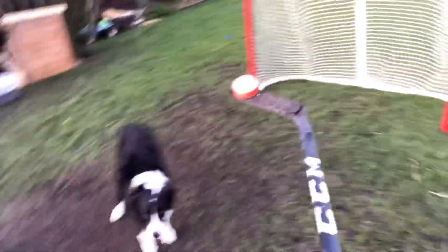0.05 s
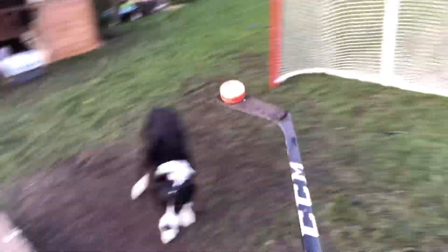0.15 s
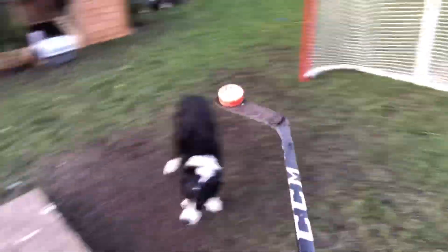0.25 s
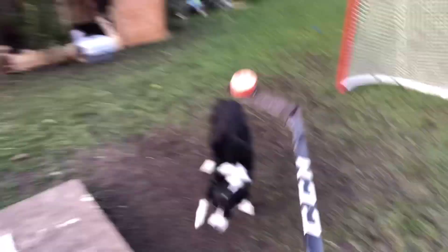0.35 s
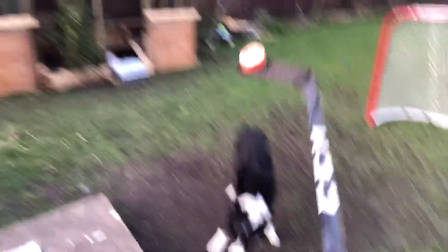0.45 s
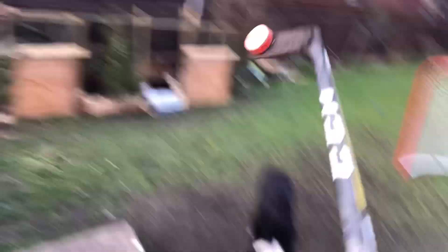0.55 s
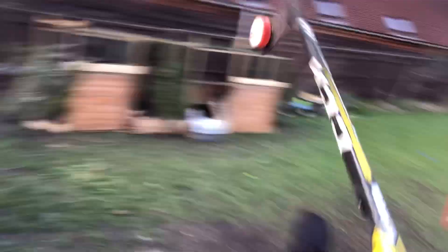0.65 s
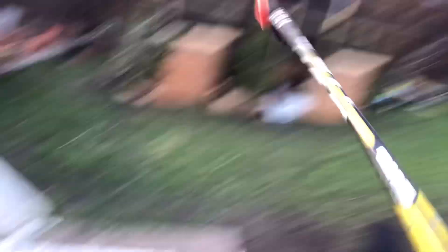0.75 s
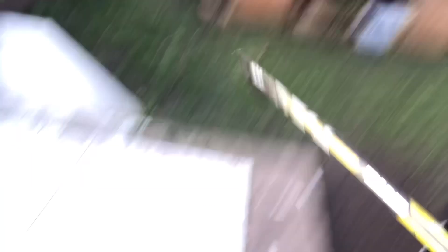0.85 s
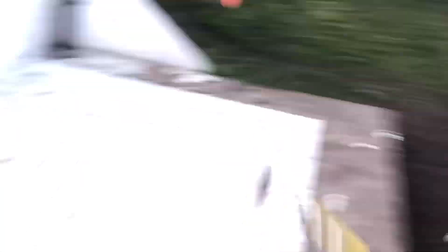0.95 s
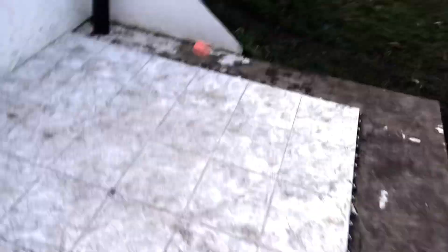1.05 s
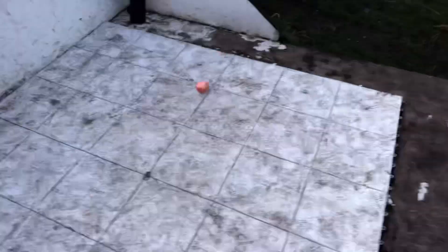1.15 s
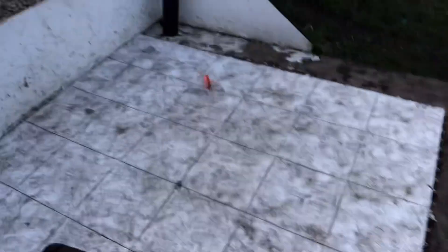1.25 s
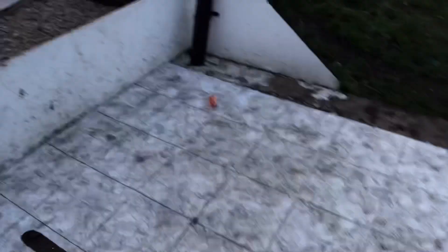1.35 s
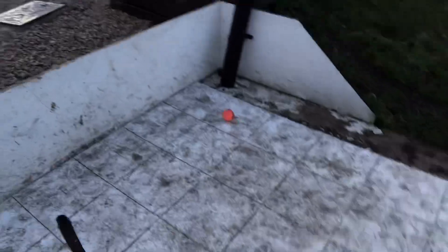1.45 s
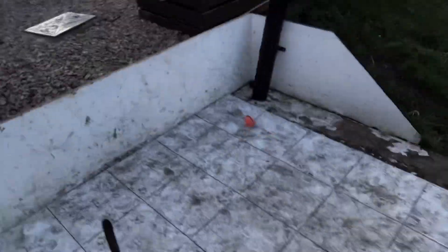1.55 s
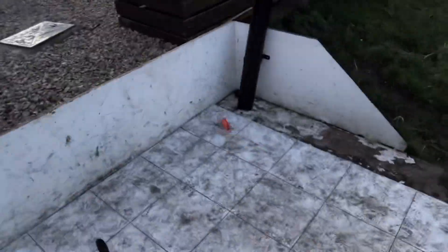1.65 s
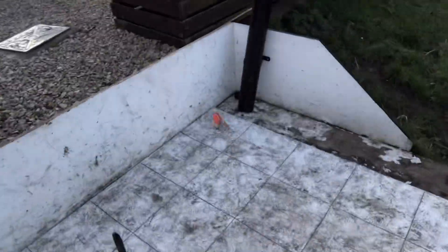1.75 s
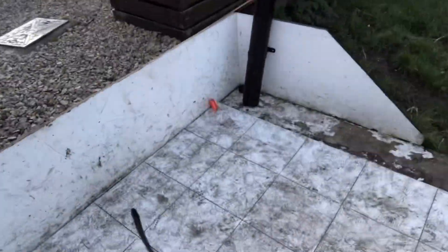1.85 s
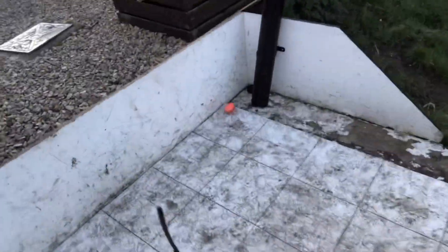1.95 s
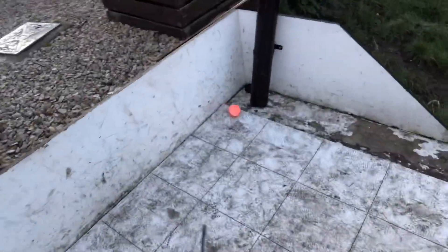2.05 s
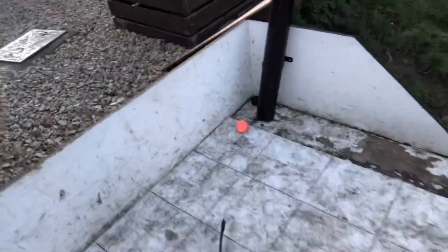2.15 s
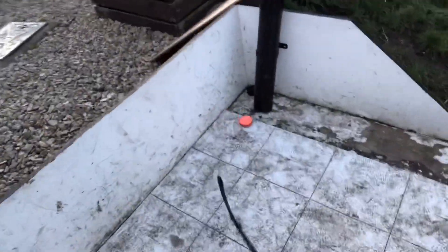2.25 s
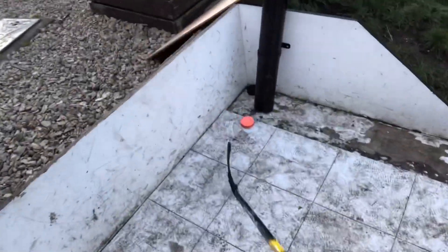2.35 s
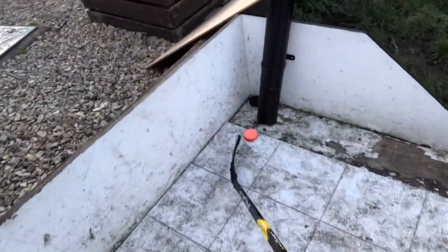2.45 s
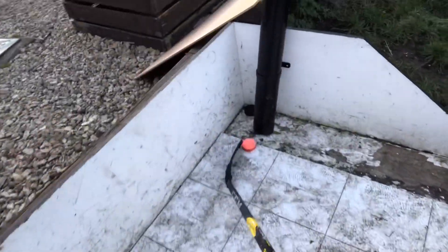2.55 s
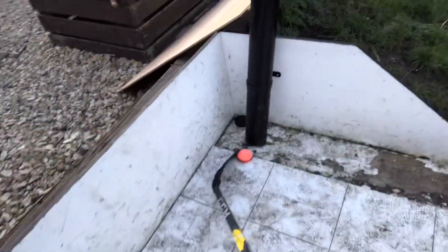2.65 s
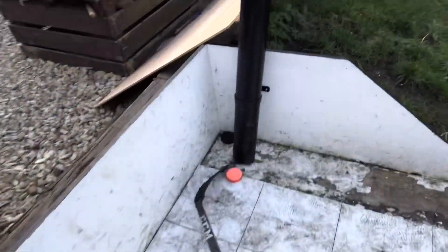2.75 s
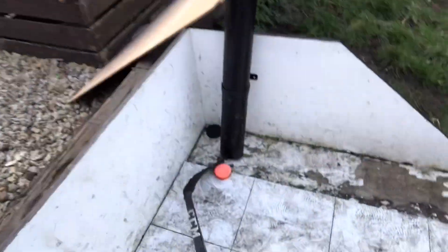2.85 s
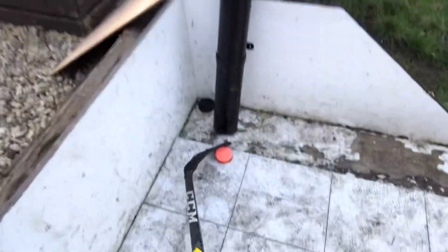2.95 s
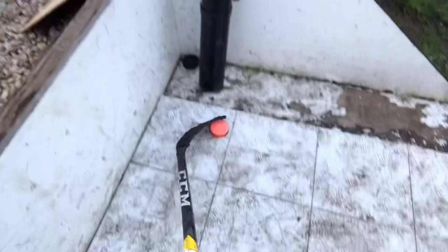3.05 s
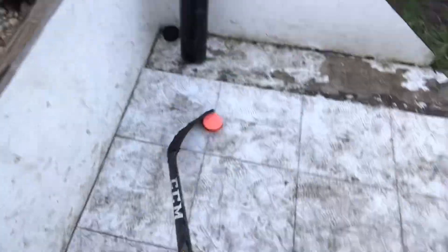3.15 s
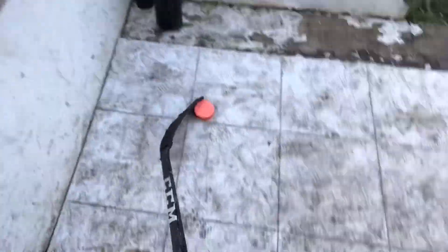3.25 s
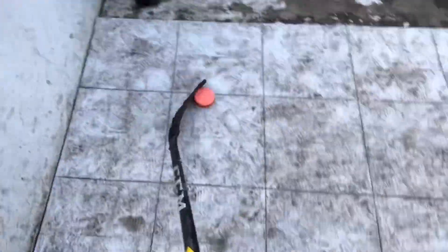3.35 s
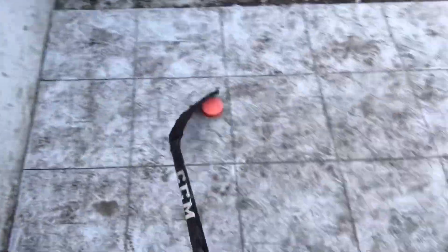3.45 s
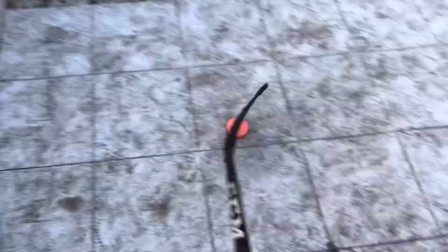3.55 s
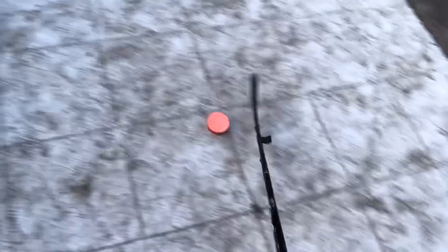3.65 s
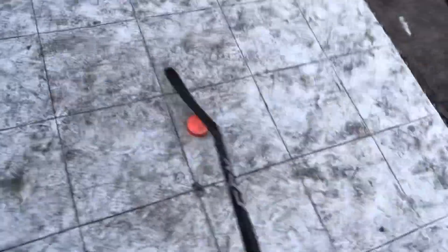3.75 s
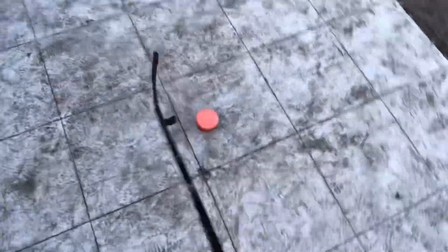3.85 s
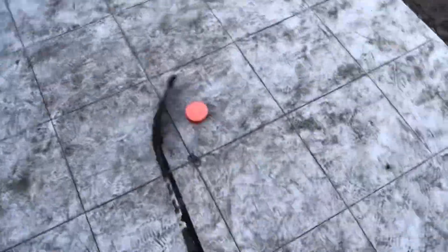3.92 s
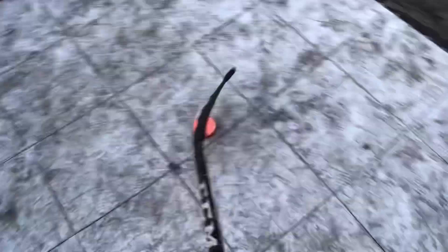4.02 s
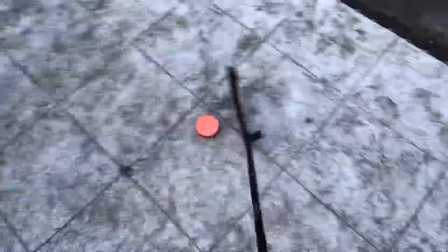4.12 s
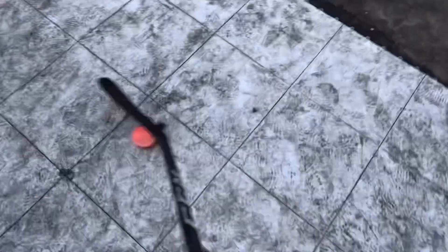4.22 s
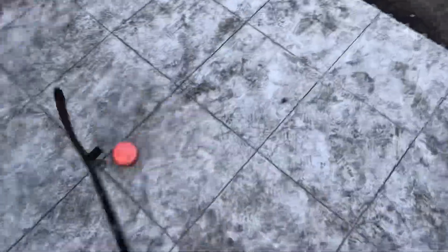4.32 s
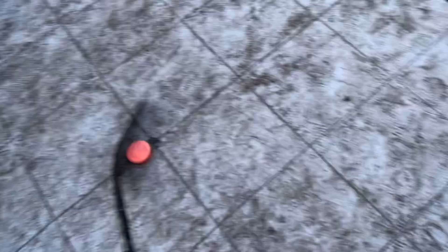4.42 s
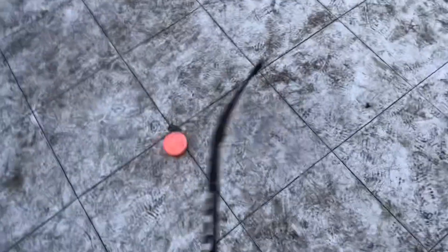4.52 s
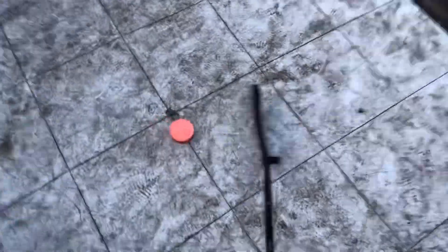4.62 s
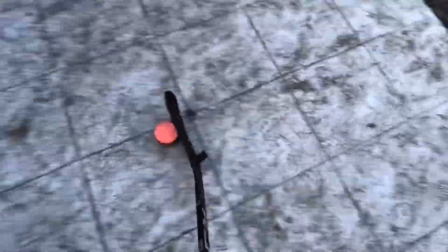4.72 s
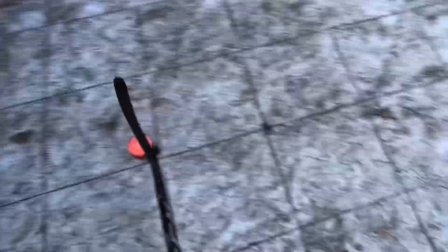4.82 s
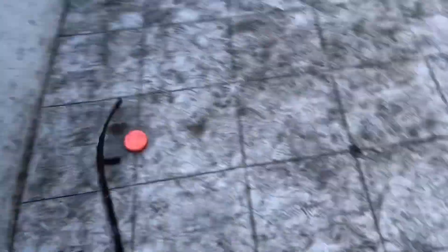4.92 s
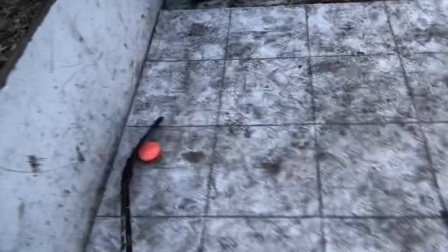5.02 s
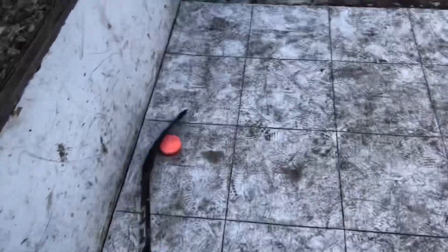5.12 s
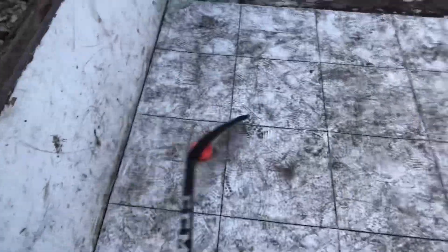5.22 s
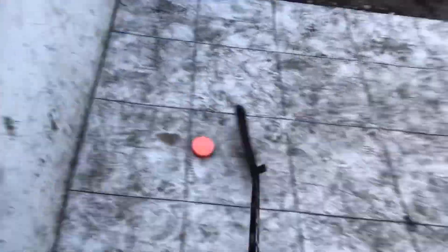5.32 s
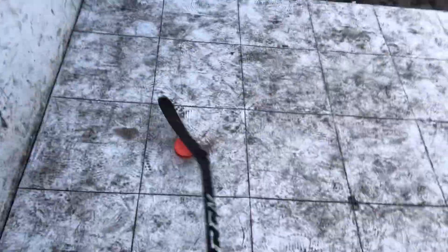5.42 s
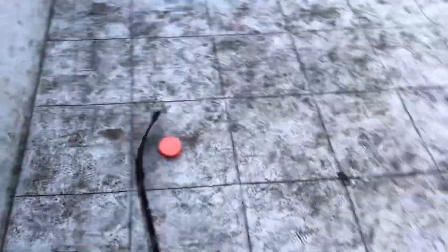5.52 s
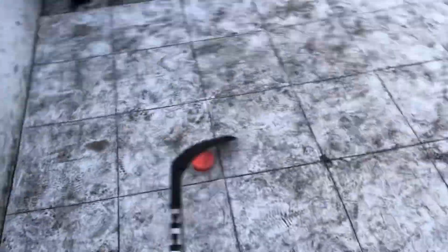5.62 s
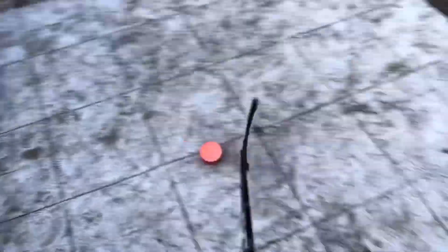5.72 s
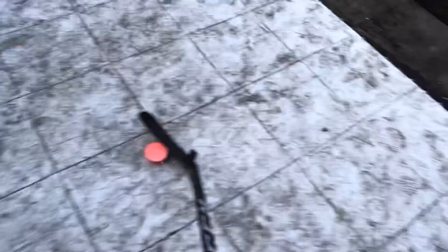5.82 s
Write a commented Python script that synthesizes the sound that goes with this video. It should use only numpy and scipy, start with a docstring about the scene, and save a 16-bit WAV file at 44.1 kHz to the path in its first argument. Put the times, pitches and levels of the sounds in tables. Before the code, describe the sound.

A hockey stick rumbles softly, a plastic puck cracks onto tiles and wobbles, then the blade scrapes and smacks it in rapid bursts.

```python
"""Dull jolts over a low rumble come first; then sharp cracks, hollow knocks and gritty scraping.
A phone is fixed to the shaft of a hockey stick that tosses a plastic puck onto patio tiles and pushes it about.
Contacts are filtered pulses, drawn out like bending waves in the shaft (treble first, bass last).
Blade and puck scrape as shaped noise and damped ticks; the hands rumble as low noise in bursts.
The wobbling puck adds a hollow note, the landing a noise wash, and the phone limits the peaks."""
import sys
import numpy as np
from scipy import signal
from scipy.fft import rfft, irfft, next_fast_len
from scipy.io import wavfile
from scipy.ndimage import uniform_filter1d, minimum_filter1d, map_coordinates

SR = 44100
rng = np.random.default_rng(int(sys.argv[2]) if len(sys.argv) > 2 else 0)


def digitize_waveform(pressure):
    """Quantize a signal to 16-bit integers and store it at the path in sys.argv[1].

    Rows of a 2-D input are taken as channels; values are limited to [-1, 1].
    """
    field = np.atleast_2d(pressure).T
    bounded = np.clip(field, -1, 1)
    quanta = np.round(bounded * 32767).astype(np.int16)
    wavfile.write(sys.argv[1], SR, quanta)


N = 259308  # samples in the scene
SPAN = 8192  # samples in one contact, and the filter padding

# bending modes of the shaft, also used by jolts, hum and rattle: centre_hz [Hz], width_hz [Hz], level_db [dB]
SHAFT_MODES = [(107, 118, -6.5), (202.2, 58, -2.5), (374, 84, 1.5), (598, 205, -4), (810, 340, -8),
               (1037, 98, -7.5), (1570, 1200, -18)]
# contacts of blade, puck and tiles: time_s [s], crack_db [dB peak],
# then relative to the crack: low_knock_db [dB], woody_knock_db [dB], click_db [dB];
# note_hz [Hz], to which the third bending mode is tuned
BLOWS = [(1.126, -14.5, -1, 1, 12, 387), (1.1302, -11, 4.5, -32, -16, 323),
         (1.1352, -6, -6, -25.5, -33, 470), (1.1397, -23, 10, -30, 15, 384),
         (1.323, -38.5, 17, -10, -10, 393), (1.3953, -41.5, 20, 6, -27, 414),
         (1.44, -36.5, 15, 3, -17, 431), (1.476, -25.5, 10.5, 7.5, -28, 434),
         (1.524, -35.5, 21, 9, -31, 450), (1.5736, -43.5, 24, 5, -22, 406),
         (1.841, -21.5, 15.5, -10, -24, 373), (1.9403, -24, 10.5, 7.5, -30, 450),
         (1.978, -32.5, 11.5, -6, 4.5, 410), (2.0532, -10, 7.5, 7, -35, 375),
         (2.2403, -16.5, -0.5, -3.5, -11, 456), (2.5028, -21.5, 6.5, 1, 2, 420),
         (2.5463, -30, 21.5, 16.5, -12, 472), (2.691, -27.5, -7, -1, -17, 400),
         (2.795, -34, 16, -6, -25, 390), (3.698, -9.5, 4.5, -1, -23, 358), (3.88, -5, -2.5, -2, -8.5, 345),
         (3.9424, -10.5, 1, -4.5, -10, 354), (3.989, -22.5, 6, -16, -23, 344),
         (4.0744, -23, 2, -3, -11, 410), (4.098, -11, 13, -4, -9, 340), (4.136, -8.5, -2, -4.5, -9, 467),
         (4.3504, -3.5, -3.5, 0, -14, 384), (4.4102, -15.5, -8, -30, -13, 350),
         (4.5705, 0, -1.5, -18, -11, 380), (4.6704, -2.5, -2, -23, -14, 332),
         (4.767, -19.5, 1, -24, -28, 374), (4.913, -1, -3, -29, -17, 406),
         (4.9366, -19.5, 7, -17, -26, 420), (4.9595, -18.5, 2.5, -4, -30, 396),
         (4.985, -15.5, 9.5, -6, -8, 503), (5.0045, -28.5, 18, 14, -30, 347),
         (5.0166, -30.5, 22, 14, -30, 480), (5.0508, -38.5, 23, 20.5, -30, 420),
         (5.0881, -32, 23, 15, -22, 324), (5.179, -28, 5, -14, -19, 470), (5.2133, -27.5, 11, -1, -19, 342),
         (5.243, -26.5, 13, 7.5, -23, 433), (5.3006, -15, 20.5, 8.5, -7, 401),
         (5.3739, -22, 6, -23, 2, 405), (5.4969, -0.5, -8, -34, -6.5, 402),
         (5.5255, -11.5, 7.5, -20, -26, 326), (5.5437, -18, 16, 8, -29, 335),
         (5.565, -16, -3, -4, -25, 420), (5.7235, -3.5, 3, -5, -18, 384), (5.7748, -14.5, -1, -1, -18, 390)]
WALLS_DB = -4  # wall tail relative to the crack


def blows():
    """Impulse response: each contact excites a crack, a click and modal knocks; a noise tail answers."""
    out, t = np.zeros(N + SPAN), np.arange(SPAN) / SR
    f = np.fft.rfftfreq(SPAN, 1 / SR)
    for time_s, crack_db, low_db, wood_db, click_db, note_hz in BLOWS:
        scatter_db = rng.normal(0, 4.44, (len(SHAFT_MODES), 1))
        shaft = modes(SHAFT_MODES, f, scatter_db, note_hz / SHAFT_MODES[2][0])
        # the wave runs back to the blade and up again
        bounce = climb(f) * (1 + 0.41 * climb(f, trips=2))
        low = peak1(irfft(bounce * shaft * band(f, 145, 480)))
        wood = peak1(irfft(bounce * (shaft + 2.2) * band(f, 695, 1040) ** 2))
        knocks = amp(low_db) * low + amp(wood_db) * wood

        chatter = rfft(rng.standard_normal(SPAN) * amp(-60 * t / 0.0062))  # noise burst, T60 6.2 ms
        crack_band = band(f, 715, 4860) / (1 + 1j * f / 6000) ** 2
        crack = peak1(irfft(climb(f) * crack_band * (1 + 0.37 * chatter)))
        click = peak1(irfft(climb(f) * band(f, 2800, 8500) * (0.28 + chatter)))
        sharp = crack + amp(click_db) * click
        walls = irfft(rfft(sharp) * rfft(tail()))

        contact = sharp + amp(WALLS_DB) * walls + knocks
        out[round((time_s - .0003) * SR):][:SPAN] += amp(crack_db) * contact
    return out[:N]


TRAVEL = .075  # a bending wave of f Hz needs TRAVEL / sqrt(f) seconds to climb the shaft


def climb(f, trips=1):
    """Dispersion: high bending waves travel faster, so a pulse is drawn out into a falling chirp."""
    return np.exp(-4j * np.pi * TRAVEL * trips * np.sqrt(f))


# decay at the patio walls: frequency_hz [Hz], t60_s [s]
WALL_DECAY = [(300, 0.39), (1500, 0.037), (5000, 0.043), (14000, 0.039)]


def tail():
    """Reverberation: a fresh noise burst in which each frequency dies at its own speed."""
    hz, t, z = signal.stft(rng.standard_normal(SPAN), SR, nperseg=128)
    decay = amp(-60 * t / along(WALL_DECAY, hz)[:, None])
    x = signal.istft(z * decay, SR, nperseg=128)[1][:SPAN]
    return x / np.linalg.norm(x)


# dull jolts of the grip: time_s [s], push_db [dB peak], tap_db [dB relative to the push]
JOLTS = [(0.014, -26, -29), (.043, -28.5, -27), (0.159, -27.5, -30), (.213, -26.5, -28), (.322, -31.5, -24),
         (.537, -24, -25), (0.719, -31, -30), (0.496, -24.5, -24), (0.775, -19, -21), (0.793, -19, -30),
         (0.83, -11, -35), (0.859, -18, 0), (0.899, -22, -25), (0.944, -17, -16), (1.997, -18, -19),
         (2.124, -6, -29), (2.16, -17.5, -1.5), (2.374, -23.5, -32), (2.42, -19, -33), (2.705, -9.5, -35),
         (3.155, -24, -4), (3.299, -15.5, -24), (3.33, -5, -26), (3.35, -9, 0), (3.539, -18.5, -21),
         (3.658, -3.5, -4), (3.793, -22, -15), (4.454, -14.5, -32), (4.517, -11, -11), (4.831, -21.5, 4),
         (4.902, -11, -4.5), (5.069, -6, 1), (5.091, -11, -10), (5.26, -11.5, -16), (5.384, -9, -16),
         (5.466, -5, -24), (5.55, -2, 6)]


def jolts():
    """Band-limited excitation: soft pushes drive low bending waves; a tap adds the harder edge."""
    out, f = np.zeros(N + SPAN), np.fft.rfftfreq(SPAN, 1 / SR)
    for time_s, push_db, tap_db in JOLTS:
        scatter_db = rng.normal(0, 4.1, (len(SHAFT_MODES), 1))
        shaft = climb(f) * (modes(SHAFT_MODES, f, scatter_db, rng.normal(1, 0.18)) + 0.057)
        push_band = band(f, 118, 126) / (1 + 1j * f / 900) ** 2
        push = peak1(irfft(shaft * (1 + .5 * climb(f, trips=1.98)) * push_band))
        tap = peak1(irfft(shaft * band(f, 500, 1300) / (1 + 1j * f / 900) ** 4))
        out[round((time_s - .003) * SR):][:SPAN] += amp(push_db) * (push + amp(tap_db) * tap)
    return out[:N]


# the puck chatters against the blade: start_s [s], end_s [s], level_db [dB]
RATTLES = [(1.94, 1.999, -40.5), (4.894, 5.076, -31), (5.474, 5.564, -32)]


def rattle():
    """Resonance: lumpy noise, like knocks too close to count, drives the upper bending modes."""
    knocks = filtered(grains(9.7, 160), lambda f: (modes(SHAFT_MODES, f) + 0.71) * band(f, 580, 1270) ** 2)
    return total(*[amp(db) * plateau(a, b) for a, b, db in RATTLES]) * unit(knocks)


# the landed puck wobbles on its rim: time_s [s], level_db [dB]
WOBBLE_LEVEL = [(1.144, -17.5), (1.165, -11.5), (1.19, -28), (1.288, -42), (1.438, -50), (1.476, -32),
                (1.8, -50)]


def landing():
    """Modal resonance: the wobbling puck keeps one hollow note of the tile going, as narrow-band noise."""
    note = filtered(grains(5.9, 39.66), lambda f: modes([(423.7, 45, 0)], f) ** 2)
    return amp(curves([(1.14, -90), *WOBBLE_LEVEL, (1.85, -90)])[0]) * unit(note)


# spectrum of the wash: frequency_hz [Hz], level_db [dB, relative]
SPLASH_SPECTRUM = [(600, -6), (1500, 1), (4000, -4.5), (6000, -3), (9000, -12.5), (15500, -21),
                   (16900, -70)]
LANDING_S, SPLASH_DB = 1.14, -29.5
SPLASH_T60, SPLASH_TOP_T60 = 0.49, 0.54  # seconds, below and above about 6 kHz


def splash():
    """Diffuse decay: the garden answers the landing with a wash whose top lasts slightly longer."""
    wash = unit(filtered(rng.standard_normal(N), lambda f: amp(along(SPLASH_SPECTRUM, f))))
    dull = filtered(wash, lambda f: 1 / (1 + (f / 6000) ** 4))
    dull_gain, top_gain = [dying([(LANDING_S, SPLASH_DB)], t60) for t60 in (SPLASH_T60, SPLASH_TOP_T60)]
    return dull_gain * dull + top_gain * (wash - dull)


# faint treble hiss under the slides: time_s [s], level_db [dB]
FAINT_HISS = [(0, -65), (.2, -81), (.5, -59.5), (.75, -60), (.9, -56.5), (1.1, -58), (1.5, -65),
              (2.35, -62), (2.7, -52.5), (5.88, -69)]
# every blow sends the puck skidding: levels relative to the crack, T60 in seconds
SKID_DB, SKID_GRIT_DB, SKID_T60 = -30.5, -34.5, 0.17
# hum relative to slides, hands and blows; T60 in seconds after a blow
HUM_SLIDE_DB, HUM_HANDS_DB, HUM_BLOW_DB, HUM_T60 = 9, -25, -14, 0.4
ROLL_S, ROLL_END_S, ROLL_HUM_DB = 1.1, 2.25, -37.5  # a low hum lasts while the puck rolls away


def drag():
    """Friction: rubbing hands and sliding contacts set the strength of scrape, grit, hum and rumble."""
    hands = handling()
    slide, hiss = sliding()
    cracks = [row[:2] for row in BLOWS]
    skid = dying(cracks, SKID_T60)
    scrape_gain = total(slide, amp(SKID_DB) * skid)
    grit_gain = total(hiss, amp(SKID_GRIT_DB) * skid, amp(curves(FAINT_HISS)[0]))
    hum_gain = total(amp(HUM_SLIDE_DB) * slide,
                     amp(HUM_HANDS_DB) * hands,
                     amp(HUM_BLOW_DB) * dying(cracks, HUM_T60),
                     amp(ROLL_HUM_DB) * plateau(ROLL_S, ROLL_END_S))
    bumps = wobble(45)  # unevenness of the tiles, shared by blade and grit
    return scrape_gain * scrape(bumps) + grit_gain * grit(bumps) + hum_gain * hum() + hands * rumble()


# blade and puck slide over the tiles: start_s [s], end_s [s], scrape_db [dB], grit_db [dB],
# swell_db [dB change from start to end]
SLIDES = [(.6, 0.714, -66, -51, 2), (1.8, 1.897, -62, -58, -6), (2.423, 2.861, -48, -71, 6.5),
          (2.871, 3.222, -39, -44, 7.5), (3.208, 3.477, -40, -45, 3.5), (3.49, 3.699, -39.5, -46, 1),
          (3.833, 4.074, -47, -49, 4), (4.096, 4.424, -46, -51.5, 6), (4.596, 4.733, -39, -42, -0.5),
          (4.812, 4.997, -38.5, -43, -3.5), (5.08, 5.388, -38.5, -47, -0.5), (5.52, 5.59, -45.5, -45, 17.5),
          (5.605, 5.707, -42.5, -49.5, 4), (5.73, 5.787, -38, -45.5, -1), (5.846, 5.9, -56, -48, 0)]
TRAIL_DB, TRAIL_T60, TRAIL_GRIT_T60 = -6.5, 1, 0.54  # the puck glides on a little; T60 in seconds
LIFT_S, LIFT_END_S, LIFT_LEFT = 3.49, 3.498, 0.1  # the slide breaks off to this fraction


def sliding():
    """Amplitude envelope: strength of scrape and of grit hiss in the slides and their trails."""
    t = np.arange(N) / SR
    touch = 1 - (1 - LIFT_LEFT) * plateau(LIFT_S - SLIDE_RISE_S, LIFT_END_S)
    held = [plateau(a, b) * amp(swell_db * np.clip((t - a) / (b - a) - .5, -1, 1))
            for a, b, _, _, swell_db in SLIDES]
    _, ends, scrape_db, grit_db, swell_db = np.transpose(SLIDES)
    gains = []
    for db, t60 in ((scrape_db, TRAIL_T60), (grit_db, TRAIL_GRIT_T60)):
        trail = dying(zip(ends, db + TRAIL_DB + swell_db / 2), t60)
        gains.append(touch * total(*(amp(db)[:, None] * held), trail))
    return gains


# spectrum of the blade's scrape: frequency_hz [Hz], level_db [dB, relative]
SCRAPE_SPECTRUM = [(350, -18), (600, 7.5), (1000, -20), (1180, -5.5), (2280, -8), (2640, -12.5),
                   (3660, -16), (7000, -24), (9100, -51), (15400, -120)]
# modes of the hollow puck: centre_hz [Hz], width_hz [Hz], level_db [dB]
PUCK_MODES = [(2400, 350, 1), (3800, 460, -9), (4630, 350, -3), (7100, 300, -9.5)]


def scrape(bumps):
    """Friction noise: shaped blade noise, puck resonances and single ticks share one rub."""
    blade = filtered(grains(2.8, 180) * amp(1.2 * bumps), lambda f: amp(along(SCRAPE_SPECTRUM, f)))
    puck = filtered(grains(7.1, 140) * amp(2.2 * wobble(14)),
                    lambda f: modes(PUCK_MODES, f) * band(f, 1400, 8700))
    mix = unit(blade) + amp(-4.5) * unit(puck) + amp(-5.5) * unit(ticks(per_second=180))
    return patchy(mix, depth_db=3.5)


def ticks(per_second):
    """Stick-slip: grains of grit catch and let go as damped clicks of scattered pitch and size."""
    draw = rng.random((int(per_second * N / SR), 3))
    k = np.arange(128)
    hz = 1500 * 6.8 ** draw[:, 1:2]
    size_db = np.minimum(-5.5 * np.log(draw[:, 2:]), 15)
    decay_db = -60 * k / SR * hz / 9  # 60 dB in nine cycles
    click = amp(size_db + decay_db) * np.sin(2 * np.pi * hz * k / SR)
    at = (draw[:, :1] * N).astype(int) + k
    return np.bincount(at.ravel(), click.ravel(), N + len(k))[:N]


# spectrum of the grit hiss: frequency_hz [Hz], level_db [dB, relative]
GRIT_SPECTRUM = [(2060, -10), (3500, -2), (5700, -2), (10100, -3), (10900, -3.5), (11900, -5),
                 (15200, -4.5), (16100, -16), (16900, -74)]


def grit(bumps):
    """Broadband friction: grit hisses as treble noise modulated by the unevenness of the tiles."""
    hiss = filtered(grains(3.1, 300) * amp(2.8 * bumps), lambda f: amp(along(GRIT_SPECTRUM, f)))
    return patchy(hiss, depth_db=2.0)


def hum():
    """Modal resonance: lumpy noise keeps the shaft's bending modes humming."""
    return unit(filtered(grains(5.7, 50), lambda f: modes(SHAFT_MODES, f) * band(f, 290, 510)))


# spectrum of the hands on the shaft: frequency_hz [Hz], level_db [dB, relative]
RUMBLE_SPECTRUM = [(12, -46), (20, -23.5), (59, -1), (81, 0), (156, -7), (192, -13.5), (248, -10),
                   (273, -18), (900, -73), (1170, -84), (1980, -120)]


def rumble():
    """Structure-borne noise: hands rubbing the shaft give lumpy low-frequency noise."""
    return unit(filtered(grains(4.46, 30), lambda f: amp(along(RUMBLE_SPECTRUM, f))))


# the hands shift on the shaft in bursts: loudest_s [s], rumble_db [dB]
SHIFTS = [(.03, -23), (.19, -24), (0.389, -27), (0.548, -26), (0.852, -15.5), (1, -23), (1.17, -24),
          (1.48, -41), (1.75, -33), (2.14, -15), (2.44, -26.5), (2.719, -17.5), (2.9, -23.5), (3.1, -43),
          (3.33, -24), (3.55, -19.5), (3.72, -14), (3.94, -17), (4.13, -23.5), (4.4, -18), (4.569, -9.5),
          (4.95, -13.5), (5.1, -11), (5.28, -9), (5.43, -10.5), (5.57, -10), (5.75, -14)]
# steady rumble of the grip: time_s [s], level_db [dB]
HOLD_LEVEL = [(0, -46.5), (2.3, -37), (3.2, -31), (4.3, -29.5), (4.8, -35), (5.3, -19.5), (5.88, -39)]
SHIFT_RISE_DB_PER_S, SHIFT_FALL_DB_PER_S = 216, 140


def handling():
    """Exponential envelope: each shift of the hands swells quickly and dies more slowly into the grip."""
    t = np.arange(N) / SR
    bursts_db = np.max([db + np.minimum(SHIFT_RISE_DB_PER_S * (t - s), SHIFT_FALL_DB_PER_S * (s - t))
                        for s, db in SHIFTS], axis=0)
    return total(amp(bursts_db), amp(curves(HOLD_LEVEL)[0]))


# spectrum of garden and microphone hiss: frequency_hz [Hz], level_db [dB, relative]
QUIET_SPECTRUM = [(180, -30), (300, -15), (579, -3), (1010, -0.5), (4850, -21), (15000, -24), (16000, -42),
                  (16900, -77)]
QUIET_DB = -55


def garden():
    """Stationary noise: garden and microphone hiss form a steady floor."""
    floor = filtered(rng.standard_normal(N), lambda f: amp(along(QUIET_SPECTRUM, f)))
    return amp(QUIET_DB) * unit(floor)


def modes(table, f, scatter_db=0, stretch=1):
    """Modal superposition: a body's resonances add with alternating sign."""
    centre, width, db = np.transpose(table)[:, :, None]
    centre = centre * stretch
    sign = (-1.) ** np.arange(len(table))[:, None]
    resonance = 1j * f * width / (centre * centre - f * f + 1j * f * width)
    return np.sum(sign * amp(db + scatter_db) * resonance, axis=0)


def band(hz, lo_hz, hi_hz):
    """Band-pass response: causal two-pole slopes on both sides."""
    return (1j * hz / lo_hz / (1 + 1j * hz / lo_hz) / (1 + 1j * hz / hi_hz)) ** 2


def filtered(x, response):
    """Linear filtering: the spectrum of x times a complex response of frequency."""
    m = next_fast_len(len(x) + SPAN)
    return irfft(rfft(x, m) * response(np.fft.rfftfreq(m, 1 / SR)), m)[:len(x)]


def grains(depth_db, rate):
    """Amplitude modulation: noise in lumps of bounded size, rate random knots a second."""
    return rng.standard_normal(N) * amp(depth_db * np.clip(wobble(rate), -2, 1.4))


def wobble(rate):
    """Random modulation: a smooth curve through rate knots a second."""
    return map_coordinates(rng.standard_normal(int(N * rate / SR) + 4), [np.arange(N) * rate / SR])


def patchy(x, depth_db):
    """Spectral modulation: random patches of gain over time and frequency keep shifting the colour."""
    z = signal.stft(x, nperseg=512)[2]
    field = uniform_filter1d(rng.standard_normal(z.shape), size=14, axis=0)
    field = uniform_filter1d(field, size=10, axis=1)
    return unit(signal.istft(z * amp(depth_db * unit(field)), nperseg=512)[1][:N])


SLIDE_RISE_S, SLIDE_FALL_S = 0.014, 0.0082


def plateau(start, end):
    """Linear envelope: rise from start, hold until end, fall after it."""
    t = np.arange(N) / SR
    return np.clip(np.minimum((t - start) / SLIDE_RISE_S, (end - t) / SLIDE_FALL_S + 1), 0, 1)


def dying(events, t60):
    """Exponential decay: the strongest of the tails after (s, dB) events."""
    t = np.arange(N) / SR
    return np.max([(t >= s) * amp(db - 60 * np.abs(t - s) / t60) for s, db in events], axis=0)


def total(*gains):
    """Incoherent summation: unrelated sounds add in power."""
    return np.sqrt(np.sum(np.square(gains), axis=0))


def curves(rows):
    """Linear interpolation: one value per sample for each column after the time."""
    s, *cols = np.transpose(rows)
    return [np.interp(np.arange(N) / SR, s, c) for c in cols]


def along(points, hz):
    """Logarithmic frequency scale: (Hz, value) points interpolated on it."""
    f, v = np.transpose(points)
    return np.interp(np.log(hz + 1), np.log(f + 1), v)


def amp(db):
    """Decibel law: 20 dB is a factor of ten in amplitude."""
    return 10 ** (np.asarray(db) / 20)


def unit(x):
    """Power normalisation: scale to an RMS of one."""
    return x / np.sqrt(np.mean(x ** 2) + 1e-20)


def peak1(x):
    """Peak normalisation: scale to a peak of one."""
    return x / np.abs(x).max()


def scene():
    """Linear superposition: all sources add at the phone."""
    return (blows() + jolts() + rattle() + landing() + splash() + drag() + garden())[None]


TOP_HZ = 17030


def record(dry):
    """Peak limiting and band limiting: a fast limiter holds the peaks, then the top is cut."""
    need = np.minimum(1, .88 / (np.abs(dry[0]) + 1e-9))
    gain = uniform_filter1d(minimum_filter1d(need, size=129), size=65)
    return filtered(dry[0] * gain, lambda hz: hz < TOP_HZ)[None]


dry = scene()
out = record(dry)
digitize_waveform(out)
```